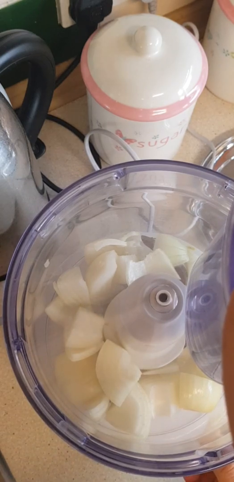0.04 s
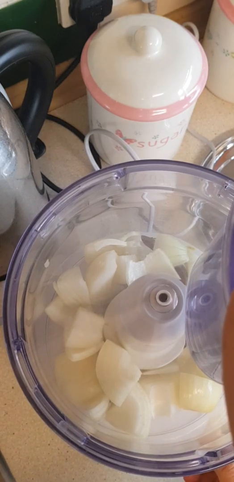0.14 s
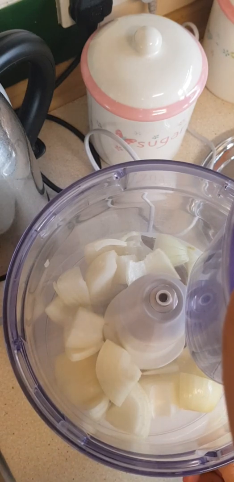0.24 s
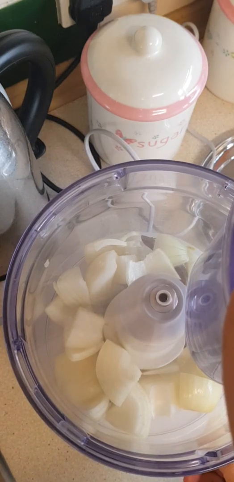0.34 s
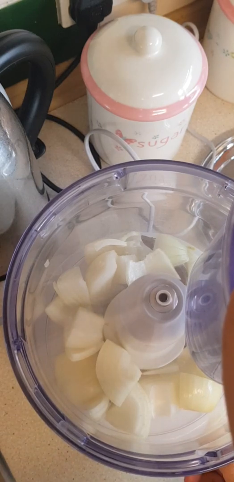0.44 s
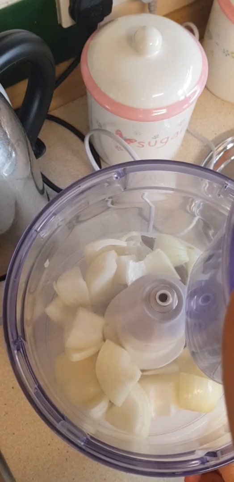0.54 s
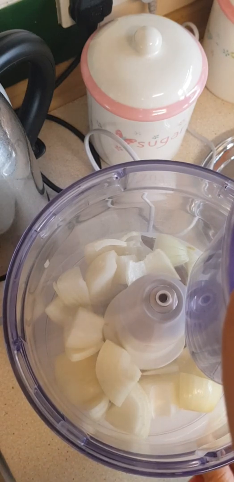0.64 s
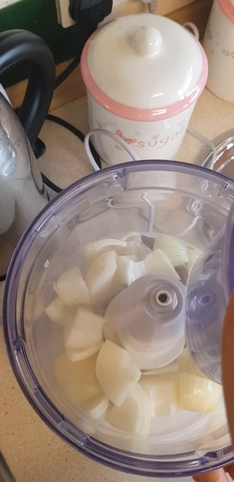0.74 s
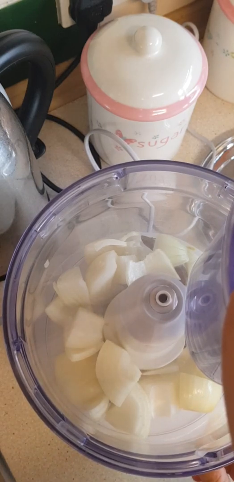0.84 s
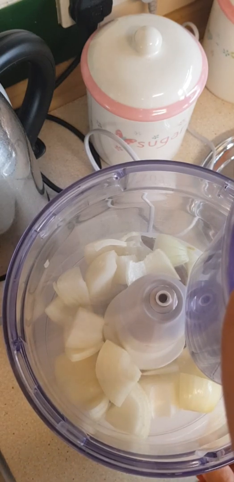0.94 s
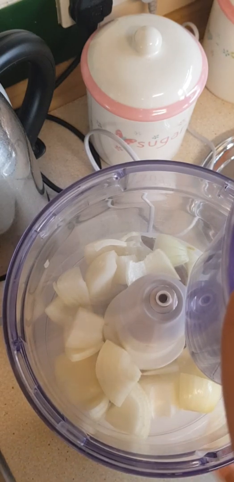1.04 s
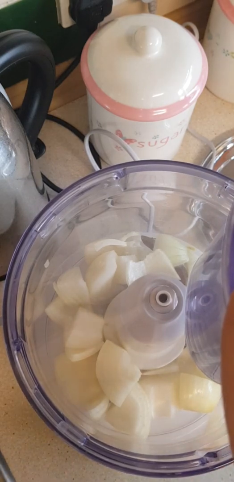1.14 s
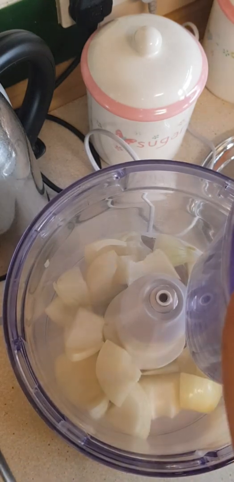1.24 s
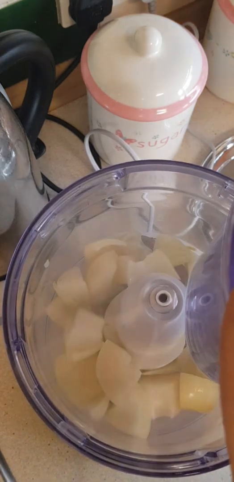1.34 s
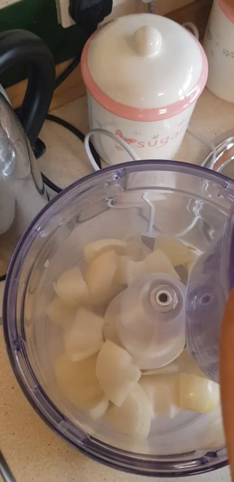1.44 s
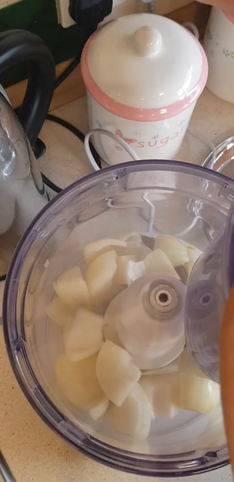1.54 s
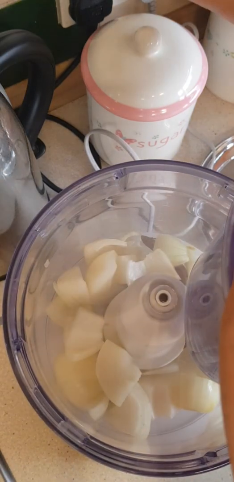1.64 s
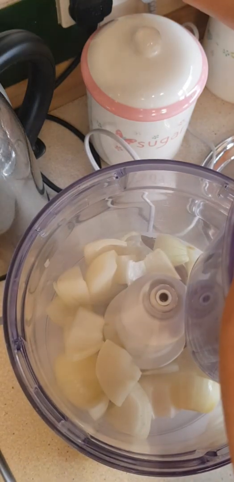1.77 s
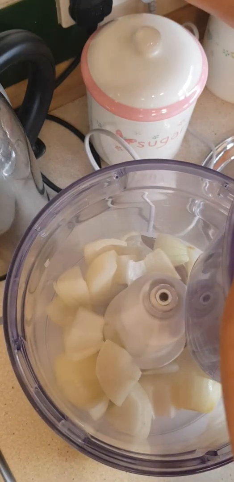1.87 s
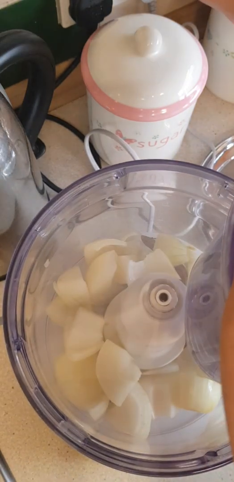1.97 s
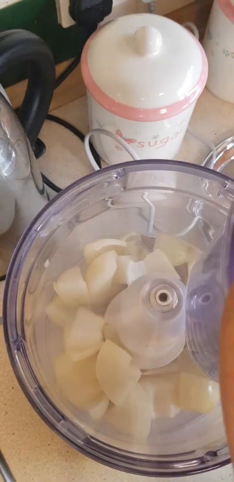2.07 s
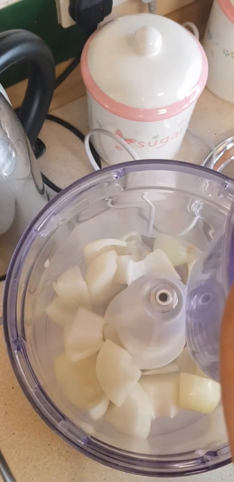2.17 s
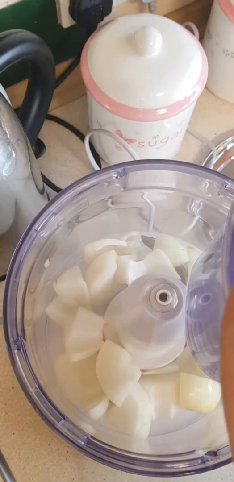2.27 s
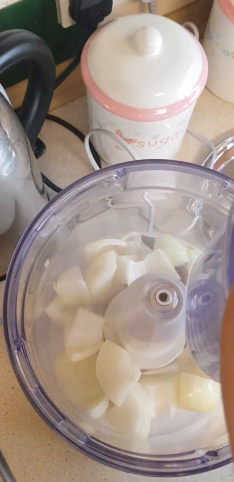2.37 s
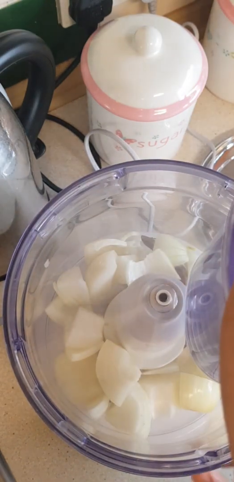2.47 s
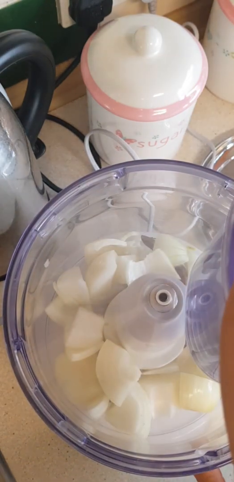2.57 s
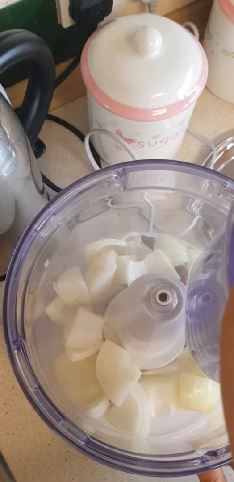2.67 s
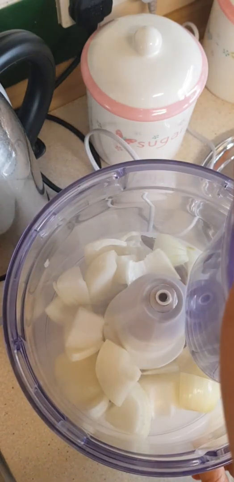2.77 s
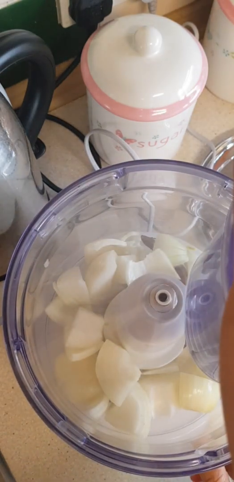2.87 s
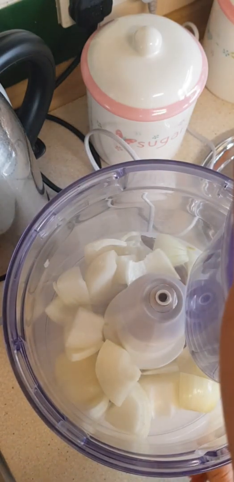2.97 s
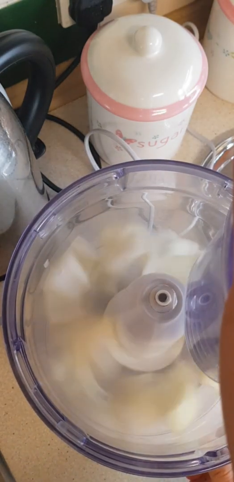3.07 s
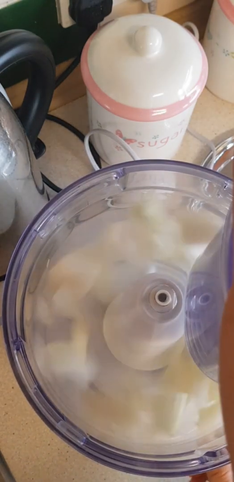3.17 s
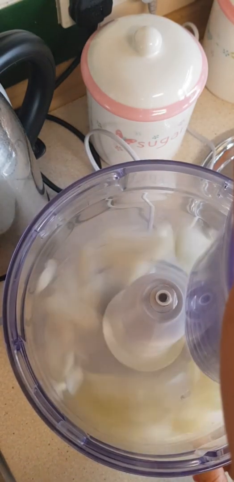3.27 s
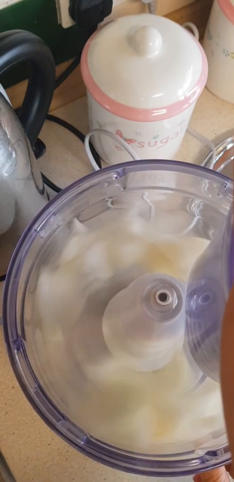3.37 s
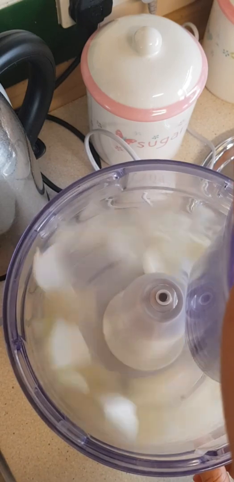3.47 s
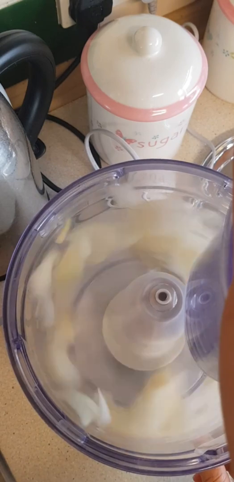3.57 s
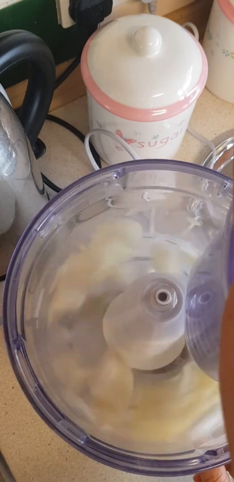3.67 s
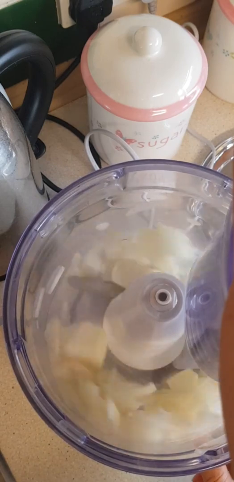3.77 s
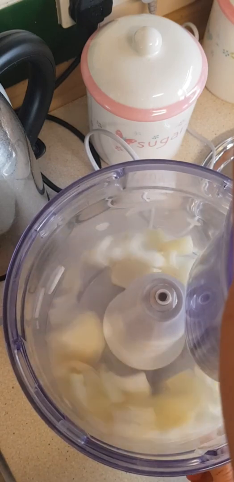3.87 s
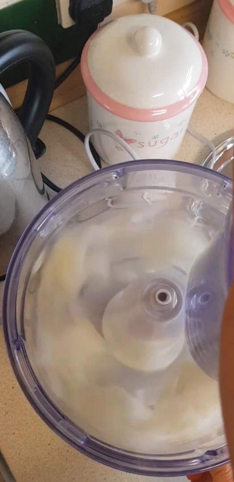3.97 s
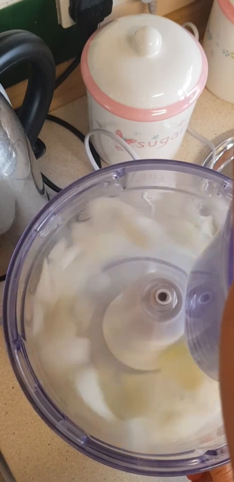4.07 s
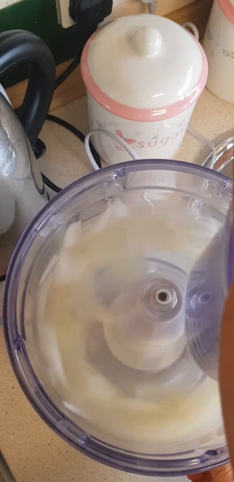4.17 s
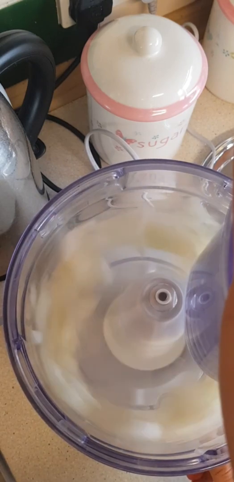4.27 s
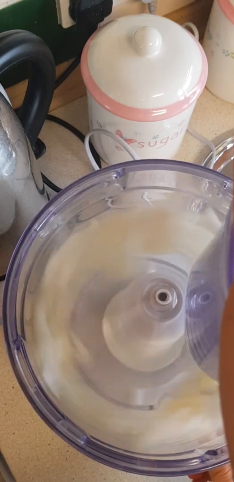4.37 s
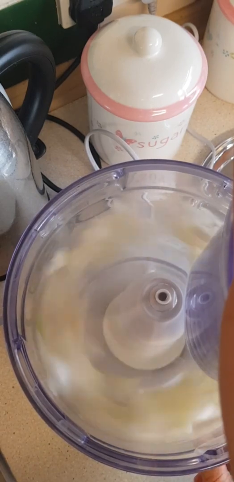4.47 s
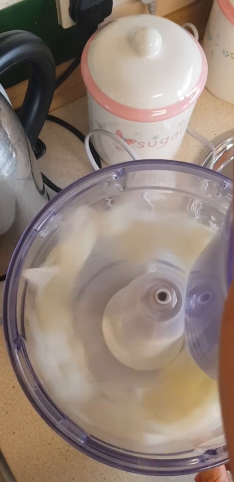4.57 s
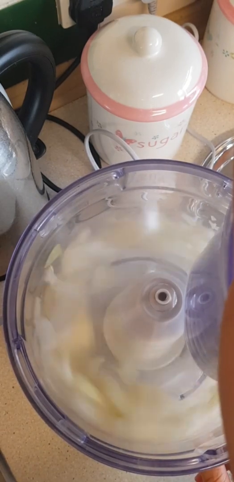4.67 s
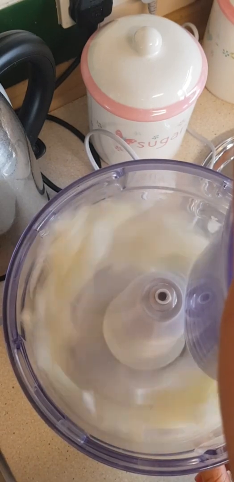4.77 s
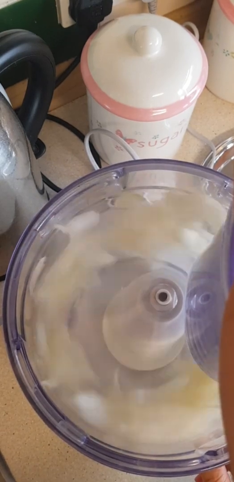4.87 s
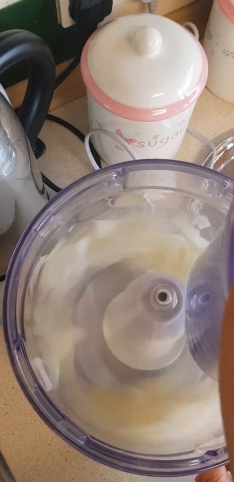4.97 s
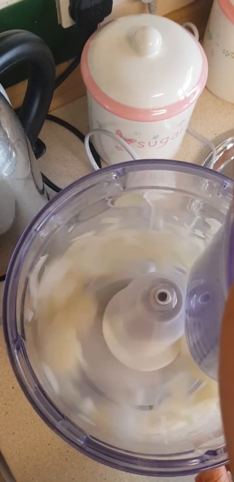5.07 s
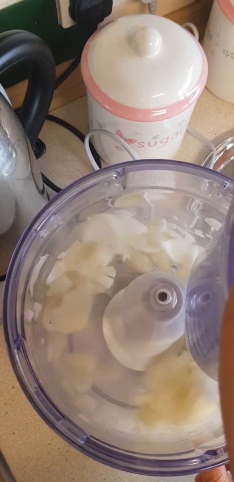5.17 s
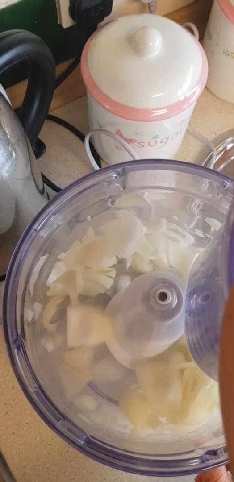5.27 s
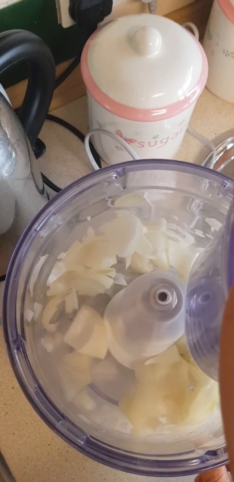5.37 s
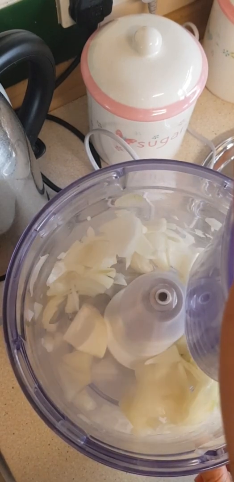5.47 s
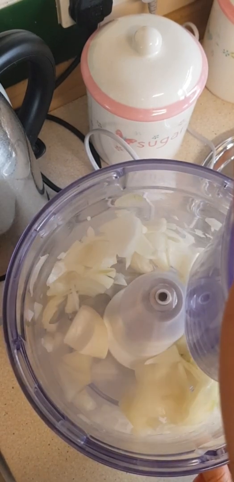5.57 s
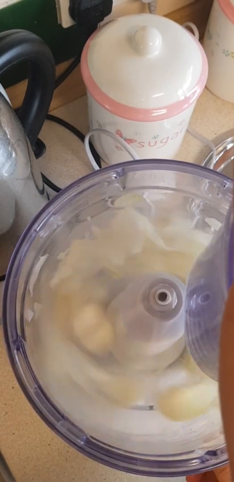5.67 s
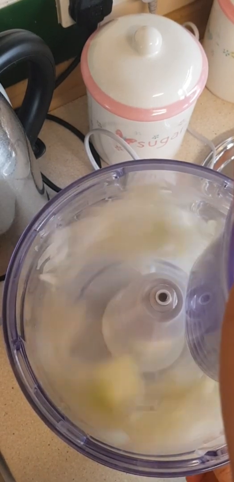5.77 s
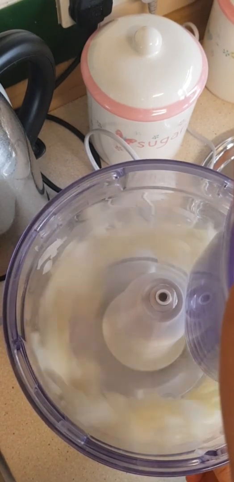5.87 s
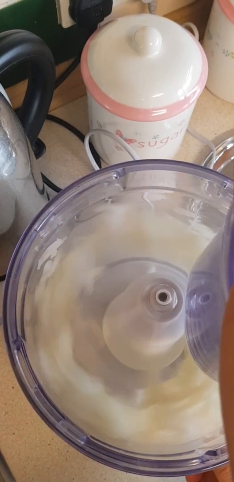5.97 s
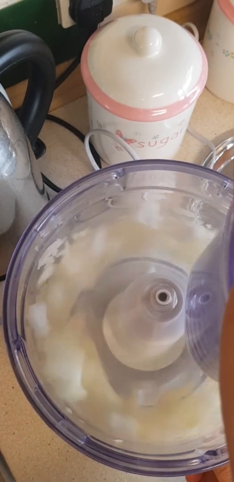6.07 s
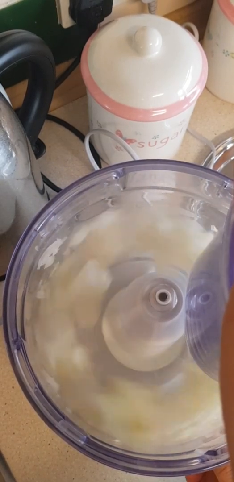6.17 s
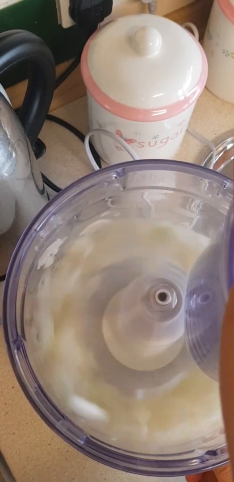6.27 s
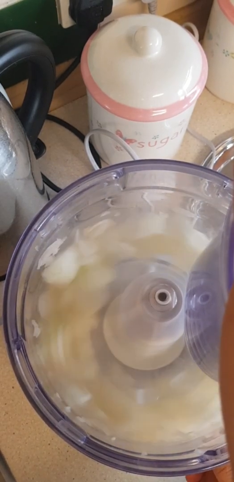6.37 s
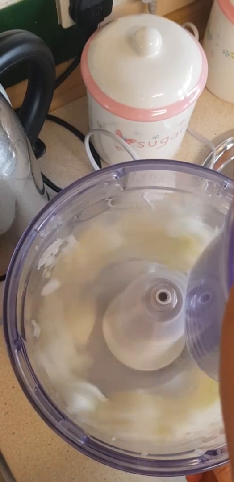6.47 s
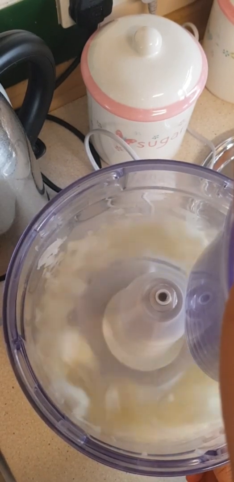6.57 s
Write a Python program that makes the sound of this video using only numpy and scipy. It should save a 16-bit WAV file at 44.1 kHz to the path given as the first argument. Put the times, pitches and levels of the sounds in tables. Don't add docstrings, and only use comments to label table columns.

```python
import sys
import numpy as np
from scipy import signal
from scipy.fft import rfft, irfft, next_fast_len
from scipy.io import wavfile
from scipy.ndimage import uniform_filter1d

SR = 44100
rng = np.random.default_rng(int(sys.argv[2]) if len(sys.argv) > 2 else 0)


def store_pcm(level_fs):
    pcm = np.round(np.clip(level_fs, -1, 1) * 32767).astype(np.int16)
    wavfile.write(sys.argv[1], SR, np.atleast_2d(pcm).T)


def gain_from_db(level_db):
    decades = np.asarray(level_db, float) / 20
    return 10 ** decades


N = 292486
SIZE = next_fast_len(N)
HZ = np.maximum(np.fft.rfftfreq(SIZE, 1 / SR), 1)

# (f/Hz, level/dB per Hz)
QUIET_COLOUR = [(25, -92), (52, -82), (80, -92), (120, -89), (200, -93), (400, -94), (600, -99),
                (900, -110), (2000, -113), (5000, -116), (8300, -128), (10500, -115), (14500, -106),
                (16500, -107)]
# (f/Hz, level/dB, sway/dB)
FRIDGE = [(239.3, -67, 1.2), (355, -79, 4), (527, -80, 4)]
# (f/Hz, correlation)
LIKENESS = [(30, .92), (130, .85), (290, .83), (640, .5), (1400, .05), (15000, 0)]
# (f/Hz, t60/s)
KITCHEN_T60 = [(200, .5), (1000, .46), (4000, .38), (12000, .29)]
# ([(t/s, level/dB), ..], centre f/Hz)
RUBS = [
    ([(.59, -76), (.63, -48.5), (.655, -46), (.68, -41.5)], 1700),
    ([(1.45, -68), (1.5, -58), (1.6, -59), (1.7, -69.5), (1.78, -62.5)], 4100),
    ([(5.6, -84.5), (5.63, -70.5), (5.65, -54), (5.67, -46)], 1800),
]
# (t/s, snap level/dB, snap f/Hz, snap t60/s, bowl ring level/dB)
NUDGES = [(.215, -54, 1050, .1, -64), (.99, -46, 600, .08, -51), (1.94, -48, 400, .08, -52),
          (1.96, -52, 4500, .15, -70), (2.662, -45, 800, .1, -54), (5.285, -42, 270, .07, -62),
          (5.345, -40, 260, .08, -58)]
# (t/s, snap level/dB, snap f/Hz, snap t60/s, bowl ring level/dB)
KNOCKS = [(.6585, -23, 2140, 0.022, -44), (.659, -23, 12900, 0.004, -80), (0.699, -51, 1900, 0.72, -63),
          (.745, -46, 1540, 0.046, -61), (1.623, -30, 754, 0.054, -48.5),
          (1.6235, -33, 3950, 0.0059, -77.5), (1.716, -29.5, 5900, 0.006, -49.5),
          (1.7855, -0.5, 4950, 0.0059, -56), (1.7885, -18.5, 4800, .004, -49),
          (1.7856, -14, 13000, .002, -75), (1.808, -21, 1400, .03, -50), (3.009, -32, 2400, 0.41, -48),
          (3.043, -9, 3020, 0.011, -36), (3.6, -29, 3800, 0.025, -36), (3.874, -39.5, 3886, 0.064, -81),
          (5.21, -50.5, 3193, .04, -50.5), (5.65, -40.5, 2993, 0.068, -55), (5.672, -34, 1500, 0.034, -40)]
# (f/Hz, width/Hz, level over colour/dB)
BOWL_MODES = [(52.7, 8.1, 25), (133, 20, -6.5), (295.2, 23, 17.5), (315, 18, 1), (707, 35, 8.5),
              (786, 120, 8.5), (1005, 34, 15), (1120, 22, 14), (1333, 60, 10.5), (1504, 53, 14.5),
              (1822, 95, 6), (2005, 92, 8), (2510, 53, 2), (2730, 63, 4.5), (3060, 21, -0.5),
              (3683, 130, 1)]
# (f/Hz, level/dB per Hz)
CHURN_COLOUR = [(25, -12.5), (80, -17.5), (128, -4.5), (300, -9.5), (500, -8), (800, -3.5), (1280, -8.5),
                (2040, -6.5), (3000, -2.5), (5000, -7.5), (7000, -9), (7600, -17), (12600, -13),
                (16500, -13.5)]
# (on t/s, off t/s, free tooth rate f/Hz, spin-up/s, coast/s)
PULSES = [
    (3.003, 3.250, 2533, 0.11, .477),
    (3.865, 4.432, 3043, 0.14, 1.5),
    (5.624, 7.0, 3187, .162, .8),
]
FRICTION_HZ_PER_S = [1700, 2850, 1900]
# (t/s, f/Hz, level/dB)
SPINDLE = [(5.24, 441.6, -78), (5.29, 426, -55), (5.38, 415, -64), (5.45, 388, -64.5), (5.58, 369, -77)]
# (tooth rate f/Hz, level/dB)
CLATTER = [(30, -49), (300, -36.5), (700, -35), (1200, -38.5), (2000, -47.5), (3200, -61)]
# (f/Hz, width/Hz)
HOUSING = (1540, 190)
# (t/s, level/dB)
LOAD = [(3.04, 15), (3.05, -4), (3.11, -7.5), (3.23, -6), (3.4, -3.5), (3.62, -1), (3.72, -3), (3.8, 7),
        (3.905, -12), (3.935, -6.5), (4.15, -7.5), (4.4, -8), (4.8, -6.5), (5.14, 2), (5.66, -11),
        (5.69, -9.5), (6.08, -8), (6.63, -7)]
# (full-speed level/dB, level/dB per speed doubling, stall torque level/dB)
LAYERS = [
    ((595.5, 2348.5, 0.84), (-22.5, 8, 10)),
    ((82, 611.5, 0.65), (-30.5, 7.5, 13)),
    ((2304, 12006, 0.48), (-28, 9.5, 12.5)),
    ((-5, 33.5, 1), (-50.5, 9, 3)),
]
# (t/s, added counter thud level/dB)
ROCKS = [(3.104, 20), (3.232, 20), (3.404, 17), (3.64, 14), (3.754, 23.5), (3.933, 14), (3.985, 6),
         (4.157, 12), (4.357, 6), (4.401, 9), (4.659, 5), (5.03, 12), (5.36, 10), (5.733, 21), (5.833, 21),
         (5.987, 14), (6.077, -4), (6.141, 9), (6.207, 2), (6.538, 12)]
# (tooth rate f/Hz, driven whine level/dB, coasting whine level/dB,
# overtone level/dB, rotor shake level/dB)
WHINE = [(200, -75, -75, -55, -70), (600, -45, -41, -30, -60), (850, -27, -27, -37, -56),
         (1250, -17, -23.5, -44, -30), (1600, -18, -23, -43, -33), (1950, -35, -48, -42, -42),
         (2650, -22.5, -52, -38, -44), (3200, -31, -52, -31, -44)]
# (multiple of tooth rate, level/dB)
OVERTONES = [(2, 3), (3, -3), (4, -10)]

QUIET_DB, LEFT_DB = -63, 1.8
HAND_HZ = 60
ENGAGE_S = .039
FULL_HZ = 3000
SETTLE_DB_PER_S = 134
ROCK_S = .055
TEETH = 10
TEETH_HEARD_ABOVE_HZ = 620


def rms_one(x):
    return x / np.sqrt(np.mean(x ** 2) + 1e-20)


def in_time(rows, rise_s=0.0021):
    s, *columns = np.transpose(rows)
    t = np.arange(N) / SR
    opening = np.clip((t - s[0]) / rise_s, 0, 1)
    closing = np.clip((s[-1] + 0.026 - t) / 0.022, 0, 1)
    return [opening * closing] + [np.interp(t, s, c) for c in columns]


def at_hz(points, hz):
    points = np.array(points)
    return np.interp(np.log(hz), np.log(points[:, 0]), points[:, 1])


def drift(rate_hz):
    r = np.exp(-16 * np.pi * rate_hz / SR)
    white = rng.standard_normal(N // 8 + 4002)
    slow = signal.lfilter([1], [1, -2 * r, r * r], white)[4000:]
    return np.interp(np.arange(N) / 8, np.arange(len(slow)), rms_one(slow))


def band(low_hz, high_hz):
    return 1 / np.sqrt((1 + (low_hz / HZ) ** 8) * (1 + (HZ / high_hz) ** 8))


def octave_filter(low_hz, high_hz, x):
    return signal.sosfilt(signal.butter(2, [low_hz, high_hz], "band", fs=SR, output="sos"), x)


def stereo_noise(gain, strength=1):
    mid, side = rfft(strength * rng.standard_normal((2, N)), SIZE) * gain
    alike = at_hz(LIKENESS, HZ)
    spectrum = np.sqrt(1 + alike) * mid + np.sqrt(1 - alike) * side * [[1], [-1]]
    return rms_one(irfft(spectrum, SIZE)[:, :N])


def room_tone():
    t = np.arange(N) / SR
    hum = 0
    for hz, db, sway_db in FRIDGE:
        hum = hum + gain_from_db(db + sway_db * drift(2.4)) * np.sqrt(2) * np.sin(2 * np.pi * hz * t)
    return hum + gain_from_db(QUIET_DB) * stereo_noise(gain_from_db(at_hz(QUIET_COLOUR, HZ)), gain_from_db(drift(9)))


def kitchen(x, wet_db):
    t = np.arange(SR // 2) / SR
    tail = 0
    for low_hz in 100 * 2 ** np.arange(0, 7.5, 1.0):
        noise = rng.standard_normal((2, len(t))) + 2 * (low_hz < 500) * rng.standard_normal(len(t))
        part = octave_filter(low_hz * (low_hz > 100) + 20, min(2 * low_hz, 20000), noise)
        tail = tail + part * gain_from_db(-60 * t / at_hz(KITCHEN_T60, 1.4 * low_hz))
    tail = tail * (1 + 1.5 * gain_from_db(-60 * t / 0.015))
    tail = gain_from_db(wet_db) * tail * np.clip(t / 0.00067, 0, 1) / np.sqrt(np.sum(tail ** 2) / 2)
    tail[0, 4] += 1
    tail[1, 0] += 1
    return signal.fftconvolve(x[None], tail, axes=1)[:, :N]


def fingers():
    out = 0
    for rows, hz in RUBS:
        gate, db = in_time(rows)
        colour = band(40, 16000) / (1 + (np.log(HZ / hz) / .7) ** 4)
        out = out + gate * gain_from_db(db) * stereo_noise(colour)
    return out


def bowl_ring(t):
    ring = 0
    for mode_hz, width_hz, db in BOWL_MODES[2:10]:
        decay = np.exp(-np.pi * (width_hz + HAND_HZ) * t)
        ring = ring + gain_from_db(db - 16.5 + rng.normal(0, 2.5)) * decay * np.sin(2 * np.pi * mode_hz * t)
    return ring


def knocks(table, rise_s):
    out, t = np.zeros(N), np.arange(SR // 4) / SR
    for s, snap_db, hz, t60_s, ring_db in table:
        grit = min(1, t60_s / .015)
        swell = np.sin(np.pi / 2 * np.clip(t / rise_s, 0, 1)) ** 2
        burst = grit * rng.standard_normal(len(t)) * gain_from_db(-60 * t / t60_s) * swell
        burst[round(rise_s * SR)] += 5 * (rise_s < .001)
        snap = octave_filter(hz / 2.2, min(hz * 2.1, 19000), burst)
        ring = bowl_ring(t) * np.clip(t / rise_s, 0, 1)
        at = round(s * SR)
        out[at:at + len(t)] += gain_from_db(snap_db) * snap + gain_from_db(ring_db) * ring
    dip = 1 - 0.55 / (1 + ((HZ - 8200) / 900) ** 2)
    return irfft(rfft(out, SIZE) * dip, SIZE)[:N]


def spindle():
    gate, hz, db = in_time(SPINDLE)
    return gate * gain_from_db(db + 2.5 * drift(22)) * np.sin(2 * np.pi * np.cumsum(hz) / SR)


def motor():
    t = np.arange(N) / SR
    hz, torque, loaded = np.zeros((3, N))
    for (on, off, free_hz, spin_s, coast_s), friction in zip(PULSES, FRICTION_HZ_PER_S):
        climb = free_hz * (1 - np.exp(-(np.clip(t, on, off) - on) / spin_s))
        dry_hz = friction * coast_s
        fall = (climb + dry_hz) * np.exp(-np.maximum(t - off, 0) / coast_s) - dry_hz
        engaged = t > on + ENGAGE_S
        hz = np.where(engaged, np.maximum(fall, 1), hz)
        torque = np.where(engaged, (t < off) * (1.001 - climb / free_hz), torque)
        loaded = np.where(engaged, np.clip((t - on - ENGAGE_S) / 0.0015, 0, 1), loaded)
    return np.maximum(hz, 1), uniform_filter1d(torque, size=441), loaded


def settle(db):
    t = np.arange(N) / SR
    hz, _, loaded = motor()
    db = np.where(hz > 1, db + 20 * np.log10(np.abs(loaded) + 1e-6), -150)
    return gain_from_db(np.maximum.accumulate(db + SETTLE_DB_PER_S * t) - SETTLE_DB_PER_S * t)


def clatter():
    centre_hz, width_hz = HOUSING
    resonance = 1 / (1 + (2 * (HZ - centre_hz) / width_hz) ** 2)
    noise = stereo_noise(resonance, gain_from_db(1.0 * drift(40)))
    hz, torque, _ = motor()
    return noise * settle(at_hz(CLATTER, hz) - 40 * (torque > 0))


def bowl_gain(hz):
    peaks = 0
    for centre_hz, width_hz, db in BOWL_MODES:
        peaks = peaks + gain_from_db(db) ** 2 / (1 + (2 * (hz - centre_hz) / width_hz) ** 2)
    return gain_from_db(at_hz(CHURN_COLOUR, hz)) * np.sqrt(1 + peaks)


def churn_level(full_db, octave_db, stall_db):
    hz, torque, _ = motor()
    return full_db + octave_db * np.log2(hz / FULL_HZ) + stall_db * torque


def churn():
    t = np.arange(N) / SR
    hits = (rng.random(N) < 250 / SR) * rng.exponential(1, N)
    strikes = signal.lfilter([1], [1, -.985], hits)
    lumps = gain_from_db(0.53 * drift(27))
    layers, gains = [], []
    for (low_hz, high_hz, share), levels in LAYERS:
        strength = lumps * np.sqrt(1 + abs(share) * strikes)
        layers.append(stereo_noise(bowl_gain(HZ) * band(low_hz, high_hz), strength))
        gains.append(settle(churn_level(*levels) + in_time(LOAD)[1]))
    rock_db = sum(db * np.exp(-((t - s) / ROCK_S) ** 2) for s, db in ROCKS)
    gains[-1] = (gain_from_db(-63) * (t > 3) + gains[-1]) * gain_from_db(rock_db)
    return sum(gain * layer for gain, layer in zip(gains, layers))


def gears():
    speed, torque, gate = motor()
    rate, *columns = np.transpose(WHINE)
    driven_db, coasting_db, over_db, rotor_db = [np.interp(speed, rate, c) for c in columns]
    driven = uniform_filter1d(1.0 * (torque > 0), size=2000)
    whine_db = driven * driven_db + (1 - driven) * coasting_db
    hz = np.maximum(speed * (1 + .004 * drift(30)) + 13 * drift(200), 30)
    turns = 2 * np.pi * np.cumsum(hz) / SR
    radiated = bowl_gain(HZ) * gain_from_db(-.6 * at_hz(CHURN_COLOUR, HZ))
    teeth = gain_from_db(2) * radiated ** 0.75 * band(TEETH_HEARD_ABOVE_HZ, SR)
    orders = [(1, whine_db, teeth), (1 / TEETH, rotor_db, radiated)]
    orders += [(k, db + over_db, teeth) for k, db in OVERTONES]
    tones = 0
    for k, db, gain in orders:
        level = gain_from_db(db + 3 * drift(92)) * np.interp(k * hz, HZ, gain)
        tones = tones + level * np.sin(k * turns)
    runout = 1 + .5 * np.sin(turns / TEETH)
    return gate * (speed > 1) * gain_from_db(-10) * tones * runout


def scene():
    touches = knocks(KNOCKS, rise_s=.0002) + knocks(NUDGES, rise_s=.012)
    echoed = kitchen(gears(), wet_db=2) + kitchen(touches, wet_db=3)
    near = echoed + gain_from_db(9.0) * churn() + clatter() + spindle() + fingers()
    held_db = np.interp(np.arange(N) / SR, [3.0, 3.1], [0, -2])
    return (near + gain_from_db(held_db) * room_tone()) * gain_from_db(np.array([[LEFT_DB], [-LEFT_DB]]))


def low_pass(x):
    return signal.sosfilt(signal.butter(12, 16800, fs=SR, output="sos"), x)


def record(dry):
    heard = signal.sosfilt(signal.butter(4, 44, "high", fs=SR, output="sos"), dry)
    heard = .95 * np.tanh(heard / .95)
    mix = signal.sosfilt(signal.cheby2(12, 70, 16800, fs=SR, output="sos"), heard)
    return low_pass(mix)


dry = scene()
out = record(dry)
store_pcm(out)
```